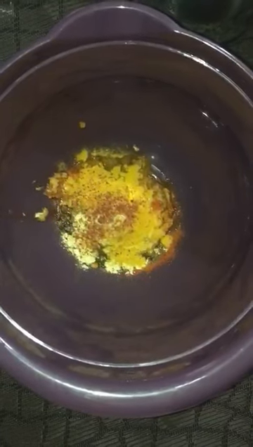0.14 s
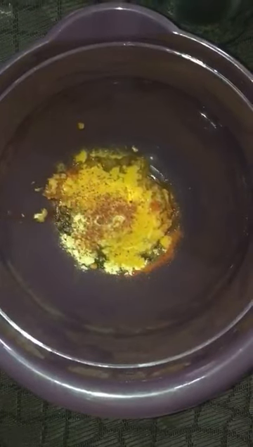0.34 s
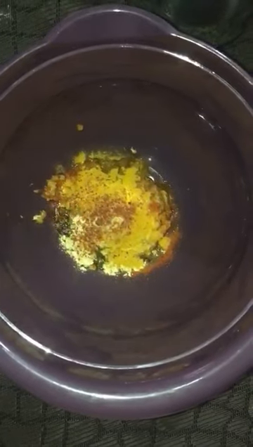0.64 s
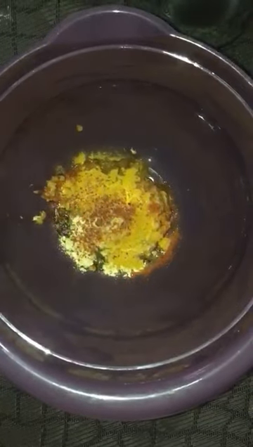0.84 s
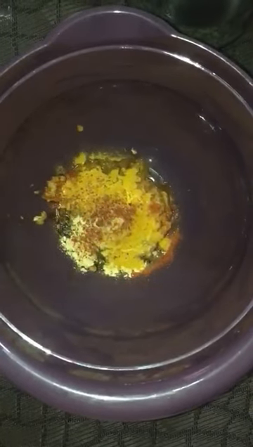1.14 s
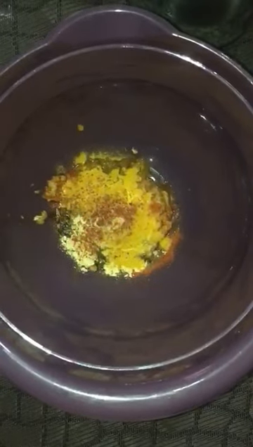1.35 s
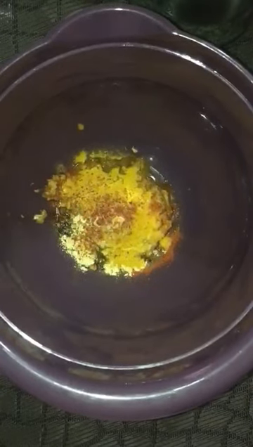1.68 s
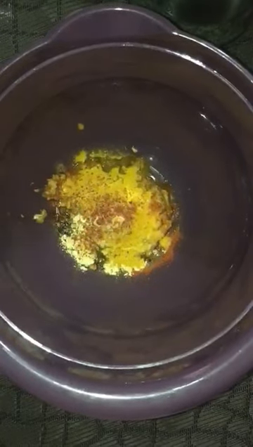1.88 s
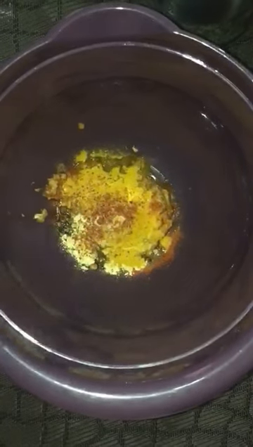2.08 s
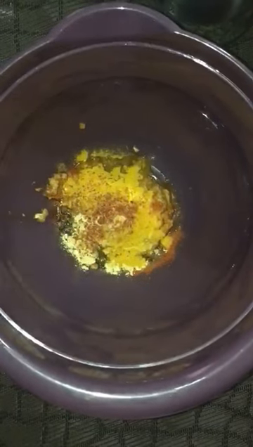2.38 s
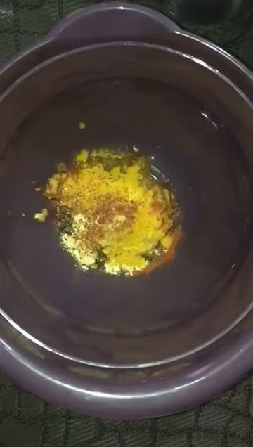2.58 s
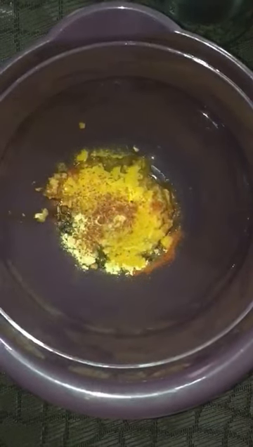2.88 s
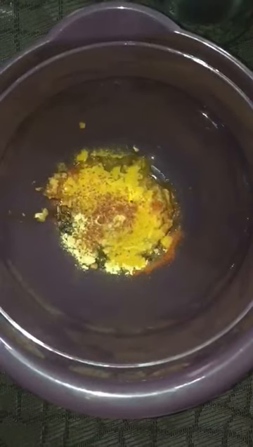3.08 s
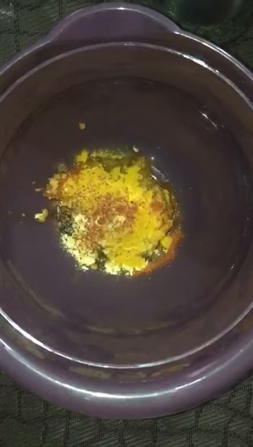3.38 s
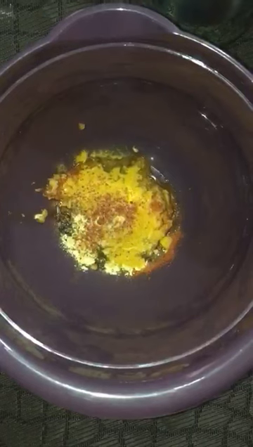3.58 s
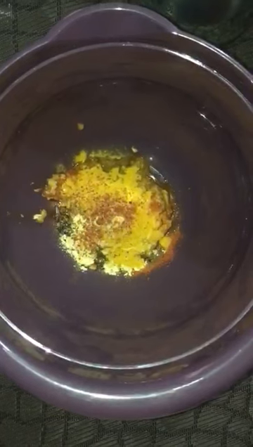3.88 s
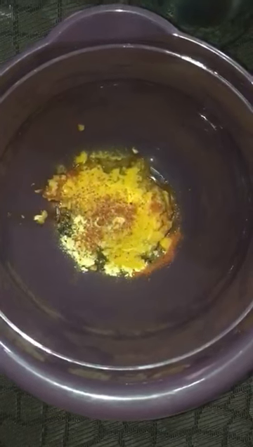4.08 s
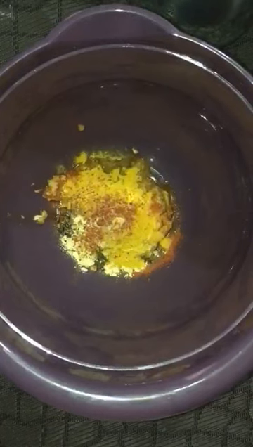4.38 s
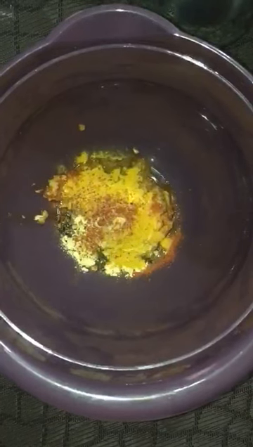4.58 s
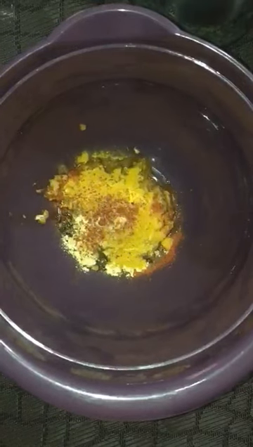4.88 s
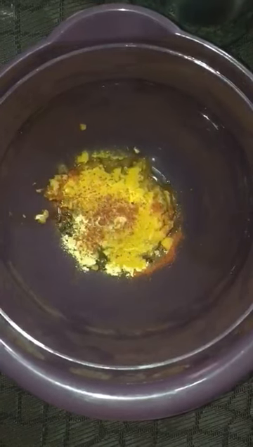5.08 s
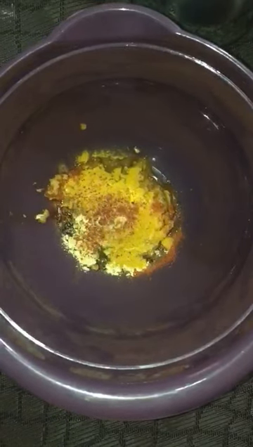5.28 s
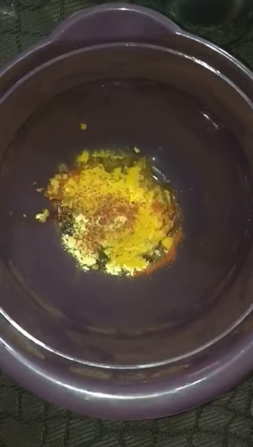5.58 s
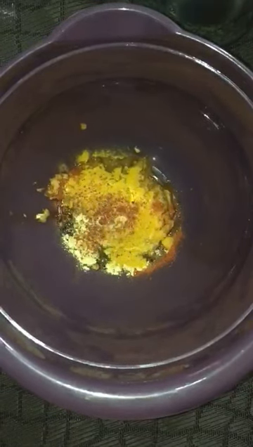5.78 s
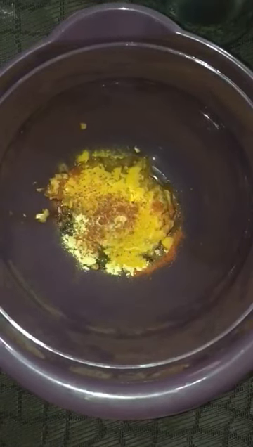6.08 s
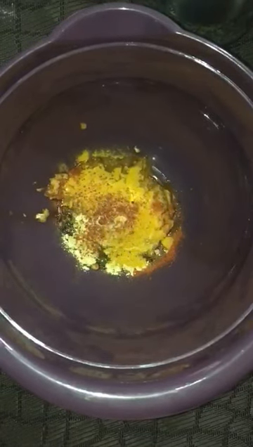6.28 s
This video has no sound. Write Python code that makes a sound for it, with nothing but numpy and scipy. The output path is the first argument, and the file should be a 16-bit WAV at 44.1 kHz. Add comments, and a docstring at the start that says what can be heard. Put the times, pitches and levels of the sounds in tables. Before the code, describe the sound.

Kitchen clatter: tin scrape and jar thump, hard knocks, a dropped lid, one loud pot clack, then fading dish wobble and small late clinks.

```python
"""Kitchen table: spices are spooned out, a steel tin scrapes, jars and lids are knocked and set down.
Blows are filtered noise plus decaying modes; steel cutlery clinks in short, dull modes; scrapes are
swells of noise. A dish rocks in paired taps, ever faster and weaker. A bird calls outside in gliding,
roughened sines, over still air, a faint two-tone hum and distant traffic with one vehicle passing."""
import sys
import numpy as np
from scipy import signal
from scipy.fft import rfft, irfft, next_fast_len
from scipy.io import wavfile
from scipy.ndimage import map_coordinates

SR = 44100
rng = np.random.default_rng(int(sys.argv[2]) if len(sys.argv) > 2 else 0)


def master(y):
    """Save y as 16-bit WAV."""
    cut = np.clip(np.atleast_2d(y).T, -1, 1)
    pcm = np.round(cut * 32767)  # scale
    wavfile.write(sys.argv[1], SR, pcm.astype(np.int16))


N = 284445
CLOCK_S = np.arange(N) / SR
T = np.arange(SR * 3 // 4) / SR  # time axis of one event, s
TOP_HZ = 11950  # band limit of the recorder


def amp(db):
    """Decibels to gain."""
    return 10 ** (np.asarray(db) / 20)


def unit(x):
    """Scale to rms 1."""
    return x / np.sqrt(np.mean(x ** 2) + 1e-20)


def blow(x):
    """Scale to the energy of 10 ms at rms 1."""
    return x * np.sqrt(SR / 100 / (np.sum(x ** 2) + 1e-20))


def fade(t60_s):
    """Exponential decay, 60 dB in t60_s."""
    return amp(-60 * T / t60_s)


def along(points, hz):
    """Read (Hz, value) points on a log frequency axis."""
    f, v = np.transpose(points)
    return np.interp(np.log(hz + 1), np.log(f), v)


def add(track, start_s, x):
    """Mix x into the track from start_s on."""
    i = round(start_s * SR)
    x = x[max(-i, 0):max(N - i, 0)]
    track[max(i, 0):][:len(x)] += x


def colour(x, spectrum):
    """Causal minimum-phase filter with the given spectrum, by folding its cepstrum."""
    m = 2 * next_fast_len(len(x) // 2 + 2048)
    gain = amp(along(spectrum, np.fft.rfftfreq(m, 1 / SR)))
    cepstrum = irfft(np.log(gain + 1e-6))
    cepstrum[1:m // 2] *= 2
    cepstrum[m // 2 + 1:] = 0
    response = np.exp(rfft(cepstrum))
    return irfft(rfft(x, m) * response, m)[:len(x)]


def wobble(knots_per_s, size):
    """Smooth random curve through normal knots."""
    knots = rng.standard_normal(int(size * knots_per_s / SR) + 4)
    return map_coordinates(knots, [np.arange(size) * knots_per_s / SR])


def contact(t60_s):
    """Contact force: a decaying burst of chatter."""
    return rng.standard_normal(len(T)) * fade(t60_s)


def decaying(resonances, sustain, damping=0):
    """Resonances as modes (Hz, dB, t60 s): narrow ones ring longest, damping shortens the high ones."""
    modes = []
    for hz, width_hz, level_db in resonances:
        t60_s = sustain * np.log(1000) / np.pi / width_hz * (1000 / hz) ** damping
        modes.append((hz, level_db, t60_s))
    return modes


def ring(modes, scatter_db=2.5):
    """Sum of decaying sines, with new strengths and signs for each blow."""
    out = np.zeros(len(T))
    for hz, level_db, t60_s in modes:
        strength = rng.choice([-1, 1]) * amp(level_db + scatter_db * rng.normal())
        out += strength * fade(t60_s) * np.sin(2 * np.pi * hz * T)
    return blow(out)


# reverberation of the kitchen: (frequency [Hz], t60 [s])
KITCHEN_T60 = [(150, 0.6), (600, 0.44), (2000, 0.38), (5000, 0.37), (11000, 0.19)]


def in_room(x, wet_db, near_db=-7, near_t60_s=0.099):
    """Add quick echoes from the table and walls, and the kitchen's frequency-dependent tail."""
    hz, t, z = signal.stft(rng.standard_normal(len(T)), SR, nperseg=256)
    decay = amp(-60 * t / along(KITCHEN_T60, hz)[:, None])
    tail = signal.istft(z * decay, SR, nperseg=256)[1][:len(T)]
    tail *= 1 - np.exp(-T / 0.0027)
    near = contact(near_t60_s) * (T > .003)
    echo = amp(wet_db) * tail / np.linalg.norm(tail)
    echo += amp(near_db) * near / np.linalg.norm(near)
    return x + signal.fftconvolve(x, echo)[:len(x)]


# thud in the table: (frequency [Hz], density [dB per Hz])
THUD_SPECTRUM = [(40, -46.5), (100, -13), (170, -4.5), (300, 0), (700, -33.5), (2000, -93)]
# crack at the contact: (frequency [Hz], density [dB per Hz])
CRACK_SPECTRUM = [(500, -42), (2500, -0.5), (5000, 2.5), (8000, -4.5), (12000, -15)]
HARD_HZ, SOFT_OCTAVES = 9400, 3  # cut-off of the hardest contact; drop at softness 1
SOFT_CRACK_DB, SOFT_THUD_DB = -24.5, 11.5  # gain changes at softness 1


def knocks(hits, spectrum, resonances, contact_t60_s, sustain, ring_db, thud_db, crack_db, wet_db):
    """Each blow is a clack, the thing's ring, a thud in the table and a crack at the contact."""
    out = np.zeros(N)
    modes = decaying(resonances, sustain)
    for start_s, level_db, softness in hits:
        clack = blow(colour(contact(contact_t60_s), spectrum))
        body = clack + amp(ring_db) * ring(modes)
        # a soft contact drives the high modes less
        cutoff_hz = HARD_HZ * 2 ** (-SOFT_OCTAVES * softness)
        body = blow(signal.lfilter(*signal.butter(1, cutoff_hz, fs=SR), body))
        thud = blow(colour(contact(0.0016), THUD_SPECTRUM))
        thud *= amp(thud_db + SOFT_THUD_DB * softness)
        crack = blow(colour(contact(0.013), CRACK_SPECTRUM))
        crack *= amp(crack_db + SOFT_CRACK_DB * softness)
        add(out, start_s, amp(level_db) * in_room(body + thud + crack, wet_db))
    return out


def steel(hits, modes, focus_db, tick_db, wet_db):
    """Struck steel: the point of contact favours modes around one height; focus_db per octave squared."""
    out = np.zeros(N)
    for start_s, level_db, centre_hz in hits:
        favoured = []
        for hz, mode_db, t60_s in modes:
            favoured.append((hz, mode_db - focus_db * np.log2(hz / centre_hz) ** 2, t60_s))
        # while the surfaces touch, they chatter and damp the modes
        pressed = ring([(hz, mode_db, .008) for hz, mode_db, _ in favoured])
        tick = blow(signal.fftconvolve(contact(0.016), pressed)[:len(T)])
        clink = ring(favoured) + amp(tick_db) * tick
        add(out, start_s, amp(level_db) * in_room(clink, wet_db))
    return out


# still air: (frequency [Hz], density [dB per Hz])
AIR_SPECTRUM = [(12, -46.5), (20, -3.5), (111, -9.5), (195, -1), (222, -6), (291, -17), (446, -26.5),
                (553, -16.5), (783, -28), (1050, -24), (1530, -26.5), (4960, -32), (8940, -34),
                (11100, -36.5), (12000, -48.5), (15600, -80.5), (22000, -120)]


def still_air(level_db=-63):
    """Steady broadband noise of the room's air."""
    return amp(level_db) * unit(colour(rng.standard_normal(N), AIR_SPECTRUM))


# hum tones: (frequency [Hz], level [dB])
HUM_TONES = [(59, -72), (101, -71)]


def electric_hum():
    """Low sines that waver slightly in level and phase."""
    out = np.zeros(N)
    for hz, level_db in HUM_TONES:
        gain = amp(level_db + 2.0 * wobble(9.9, N)) * np.sqrt(2)
        out += gain * np.sin(2 * np.pi * hz * CLOCK_S + .6 * wobble(12, N))
    return out


# traffic: (frequency [Hz], density [dB per Hz])
ROAD_SPECTRUM = [(24, -43.5), (40, -9), (106, -1.5), (146, -17), (192, -4.5), (237, -27), (351, 1.5),
                 (557, -24), (640, -9), (686, -22), (825, -9.5), (1040, -16), (2130, -16.5), (2940, -27.5),
                 (10000, -47), (13000, -65.5), (22000, -120)]
TRAFFIC_DB, PASS_DB = -75.5, -59  # distant road; one vehicle at its nearest
PASS_START_S, PASS_RISE_S, PASS_HOLD_S, PASS_FALL_S = 4.65, 0.38, 1.02, 0.77


def traffic():
    """Distant road noise; one vehicle approaches, stays near and recedes."""
    passing_s = np.cumsum([PASS_START_S, PASS_RISE_S, PASS_HOLD_S, PASS_FALL_S])
    road_db = np.interp(CLOCK_S, passing_s, [TRAFFIC_DB, PASS_DB, PASS_DB, TRAFFIC_DB])
    road = unit(colour(rng.standard_normal(N), ROAD_SPECTRUM))
    return amp(road_db + 0.45 * wobble(20.0, N)) * road


PITCH_SHAKE = .08  # scale of the pitch shake at roughness 1, as a share of pitch


def note(length_s, hz, octaves, rough, smooth_attack_s=0.0017, wet_db=-3):
    """One gliding, echoing whistle; roughness 0-1 shakes pitch and strength and slows the attack."""
    u = np.minimum(T / length_s, 1)
    pitch_hz = hz * 2 ** (octaves * (u - .5)) * (1 + PITCH_SHAKE * rough * wobble(1108, len(T)))
    attack = 1 - np.exp(-T / (smooth_attack_s * (1 + 3 * rough)))
    effort = attack * np.sqrt(1 - u) * amp(5.8 * rough * wobble(319, len(T)))
    tone = np.sin(2 * np.pi * np.cumsum(pitch_hz) / SR)
    return in_room(2 * effort * tone, wet_db, near_db=-8)


# whistles of level pitch, each led in by a short rasp: (time [s], length [s], level [dB])
BIRD_WHISTLES = [(0.482, 0.052, -51.5), (0.75, 0.048, -48.5), (4.183, .022, -49)]
WHISTLE_HZ, WHISTLE_ROUGH = 3354, .13
LEAD_HZ, LEAD_S, LEAD_DB = 2660, 0.0059, -7.5  # lead-in: mid pitch, head start, level re whistle
# rising slurs: (time [s], level [dB])
BIRD_SLURS = [(.882, -54), (4.067, -55)]
SLUR_HZ, SLUR_S, SLUR_OCTAVES, SLUR_ROUGH = 2575, 0.05, 0.16, .33  # mid pitch, length, rise
# falling rasps: (time [s], length [s], mid pitch [Hz], level [dB])
BIRD_RASPS = [(.98, 0.14, 3022, -58), (4.222, 0.054, 2837, -54.5)]
RASP_OCTAVES, RASP_ROUGH = -0.237, .95
# sagging pips: (time [s], length [s], mid pitch [Hz], level [dB])
BIRD_PIPS = [(0.898, 0.031, 1430, -50.5), (3.333, 0.046, 3850, -58), (3.543, 0.0133, 2190, -59),
             (3.918, 0.018, 4240, -60)]
PIP_OCTAVES, PIP_ROUGH = -0.12, .35


def bird():
    """A bird outside sings four kinds of note: whistle, slur, rasp and pip."""
    out = np.zeros(N)
    for start_s, length_s, level_db in BIRD_WHISTLES:
        lead = note(0.0254, LEAD_HZ, RASP_OCTAVES, RASP_ROUGH)
        add(out, start_s - LEAD_S, amp(level_db + LEAD_DB) * lead)
        add(out, start_s, amp(level_db) * note(length_s, WHISTLE_HZ, 0, WHISTLE_ROUGH))
    for start_s, level_db in BIRD_SLURS:
        add(out, start_s, amp(level_db) * note(SLUR_S, SLUR_HZ, SLUR_OCTAVES, SLUR_ROUGH))
    for start_s, length_s, hz, level_db in BIRD_RASPS:
        add(out, start_s, amp(level_db) * note(length_s, hz, RASP_OCTAVES, RASP_ROUGH))
    for start_s, length_s, hz, level_db in BIRD_PIPS:
        add(out, start_s, amp(level_db) * note(length_s, hz, PIP_OCTAVES, PIP_ROUGH))
    return out


# dish modes: (frequency [Hz], level [dB], t60 [s])
DISH_MODES = [(191, 10, 0.23), (211, -2, 0.17), (544.8, -9.5, 0.2), (634, -16, 0.12), (945, -16.5, 0.072)]
ROCK_START_S, SWING_S, SWING_SHRINK_S, SWINGS = 1.323, .14742, .00096, 29  # shrink is per swing
RETURN_S, RETURN_LAG_S = .068, .0005  # delay of a swing's second tap; its growth per swing
ROCK_DB, ROCK_FALL_DB, ROCK_HOLD = -47.5, 10, 3  # first tap, loss by the last, power of time


def rocking_dish(tap_db=-16, wet_db=-13):
    """Two taps per swing: swings shorten, the second tap lags more, the strength holds, then falls."""
    out = np.zeros(N)
    swing = np.arange(SWINGS)
    forth_s = ROCK_START_S + SWING_S * swing - SWING_SHRINK_S * swing * (swing - 1) / 2
    back_s = forth_s + RETURN_S + RETURN_LAG_S * swing
    tap_spectrum = [(100, -16), (500, 5.5), (1100, 0), (2500, -24.0), (9000, -33.5)]  # Hz, dB per Hz
    for start_s in np.concatenate([forth_s, back_s]):
        spent = (start_s - ROCK_START_S) / (back_s[-1] - ROCK_START_S)
        tap = blow(colour(contact(0.037), tap_spectrum))
        knock = in_room(ring(DISH_MODES) + amp(tap_db) * tap, wet_db, near_db=-18.5)
        add(out, start_s, amp(ROCK_DB - ROCK_FALL_DB * spent ** ROCK_HOLD) * knock)
    return out


# blows: (time [s], level [dB], softness [0-1])
TABLE_BLOWS = [(.444, -47.5, 1), (1.2035, -21, 0.048), (1.31, -40.5, 0.36), (5.133, -55.5, 0.85),
               (5.34, -48.5, .2), (5.371, -46, 1)]
# clack: (frequency [Hz], density [dB per Hz])
TABLE_SPECTRUM = [(47, -42), (80, -28), (156, 4.5), (456, -11.5), (611, 8), (679, -2), (1050, -1.5),
                  (1540, -22.5), (2150, -3.5), (2650, -14), (3480, -15), (4870, -26), (9530, -91),
                  (12000, -68.5), (15600, -86), (22000, -120)]
# resonances: (frequency [Hz], width [Hz], level [dB])
TABLE_RESONANCES = [(159, 25, -4), (617, 60, 3), (1145, 190, 11), (1960, 91, -8), (3050, 110, -30),
                    (3670, 34, -22), (5660, 63, -48), (5760, 23, -30), (8650, 130, -31)]


def table():
    """Knocks on the table top: short contact, strong thud."""
    return knocks(TABLE_BLOWS, TABLE_SPECTRUM, TABLE_RESONANCES, contact_t60_s=0.008, sustain=1.2,
                  ring_db=-3.5, thud_db=-9, crack_db=-11.5, wet_db=-10.0)


# blows: (time [s], level [dB], softness [0-1])
BOWL_BLOWS = [(.5895, -34.5, .05), (.757, -53, 0.5)]
# clack: (frequency [Hz], density [dB per Hz])
BOWL_SPECTRUM = [(120, -50), (200, -58), (589, 3.5), (903, -20), (1070, -15), (1460, -28), (2020, -14),
                 (2480, -20), (3150, -18), (4370, -33), (6260, -26.5), (6940, -36), (12000, -35),
                 (15600, -83), (22000, -120)]
# resonances: (frequency [Hz], width [Hz], level [dB])
BOWL_RESONANCES = [(614, 29, 0), (1020, 27, -10), (1980, 18, -11), (2690, 28, -19), (3490, 34, -19),
                   (6180, 41, -23)]


def bowl():
    """Knocked bowl: a few narrow modes, little thud."""
    return knocks(BOWL_BLOWS, BOWL_SPECTRUM, BOWL_RESONANCES, contact_t60_s=0.012, sustain=0.97,
                  ring_db=-1.5, thud_db=-44, crack_db=-20, wet_db=-12)


# blows: (time [s], level [dB], softness [0-1])
CAP_BLOWS = [(5.8338, -29.5, 0.041), (5.845, -36.5, 0.93)]
# clack: (frequency [Hz], density [dB per Hz])
CAP_SPECTRUM = [(88, -58), (150, -35), (225, -6), (296, -29), (404, -2), (532, -36), (615, -4), (753, -19),
                (991, -32), (1070, -8.5), (1750, 4.5), (3030, -7), (3990, -13.5), (7730, -23.5),
                (12000, -29), (15600, -90), (22000, -120)]
# resonances, shared with the ticks: (frequency [Hz], width [Hz], level [dB])
CAP_RESONANCES = [(404, 27, -6), (614, 28, -4), (1370, 160, -4), (1780, 37, 0), (2940, 22, -8),
                  (3100, 17, -10), (4450, 54, -19), (5790, 39, -19)]


def cap():
    """Knocked cap: mostly clack, with a short weak ring."""
    return knocks(CAP_BLOWS, CAP_SPECTRUM, CAP_RESONANCES, contact_t60_s=0.017, sustain=0.65,
                  ring_db=-10.5, thud_db=-35.0, crack_db=-10.5, wet_db=-12)


# blows: (time [s], level [dB], softness [0-1])
TICK_BLOWS = [(3.548, -63.5, 0.33), (4.783, -62.5, 0.03), (5.118, -46.5, 0.45), (5.13, -41.5, 0.79),
              (6.194, -52.5, 0.55), (6.206, -57, 0.34), (6.263, -62, 0.056), (6.369, -55, 1),
              (6.39, -60, 0.29), (6.416, -55.5, 0.045)]
# clack: (frequency [Hz], density [dB per Hz])
TICK_SPECTRUM = [(120, -14), (200, -33.5), (735, -5), (1360, -4.5), (2160, 1.5), (3620, -8), (3940, -38),
                 (10300, -15), (11200, -12), (12000, -22), (15600, -81), (22000, -120)]


def ticks():
    """Small ticks: clack and contact crack, almost no ring."""
    return knocks(TICK_BLOWS, TICK_SPECTRUM, CAP_RESONANCES, contact_t60_s=0.016, sustain=.8,
                  ring_db=-58, thud_db=-17, crack_db=5, wet_db=-10.5)


# blows: (time [s], level [dB], softness [0-1])
LID_BLOWS = [(1.564, -39, .75), (1.657, -44, .75), (1.7095, -19.5, .05), (1.744, -24, .55),
             (1.7855, -31.5, .6)]
# clack: (frequency [Hz], density [dB per Hz])
LID_SPECTRUM = [(59, -56), (100, -33), (227, -9), (684, -13.5), (870, 4.5), (981, -18), (1300, -13.5),
                (1460, -9), (2840, -29.5), (3140, -20.5), (4230, -41.5), (5170, -33), (8370, -49.5),
                (12000, -63), (15600, -94), (22000, -120)]
# resonances: (frequency [Hz], width [Hz], level [dB])
LID_RESONANCES = [(217.2, 110, -11.5), (890, 38, 9.5), (1097, 9.8, -8), (1270, 38, -4.5), (1620, 33, -22.5),
                  (2590, 36, -26), (3100, 95, -25.5), (5135, 30, -28.5), (5500, 65, -26), (6106, 49, -34),
                  (8324, 140, -34)]
# touches of the steel edge: (time [s], level [dB], height of the struck modes [Hz])
EDGE_TOUCHES = [(1.7095, -38.5, 5333), (1.744, -46.5, 4986)]
# edge modes: (frequency [Hz], level [dB], t60 [s])
EDGE_MODES = [(2900, -9.5, .14), (3083, -1, .31), (5055, -1.5, 0.1), (5283, 0.5, 0.12), (6090, -8, .15),
              (8700, -11, .12)]


def falling_lid():
    """The lid is nudged, drops and bounces: short clacks, with a thin ring from its steel edge."""
    clacks = knocks(LID_BLOWS, LID_SPECTRUM, LID_RESONANCES, contact_t60_s=.014, sustain=.6,
                    ring_db=-3, thud_db=-27.5, crack_db=-17, wet_db=-12)
    return clacks + steel(EDGE_TOUCHES, EDGE_MODES, focus_db=3.5, tick_db=4, wet_db=-14)


# blows: (time [s], level [dB], softness [0-1])
JAR_BLOWS = [(.1, -16, 0.51), (.111, -32, 0.03), (.311, -42, 0.36)]
# clack: (frequency [Hz], density [dB per Hz])
JAR_SPECTRUM = [(59, -52), (100, -11.5), (375, -5), (644, 7), (836, -33), (1410, -30.5), (1900, 9),
                (2140, -15), (3260, -18.5), (3540, -4), (4500, -16.5), (4780, -16.5), (11100, -39),
                (12000, -40.5), (15600, -77), (22000, -120)]
# resonances: (frequency [Hz], width [Hz], level [dB])
JAR_RESONANCES = [(374.7, 28, -5.5), (1236, 26, -23.5), (1817, 57, 4), (2606, 41, -6.5), (3125, 18, -7),
                  (4150, 44, -15), (4310, 32, -10), (4500, 35, -24), (5095, 43, -17.5), (6160, 60, -7),
                  (6070, 49, -24), (7000, 40, -26), (8120, 31, -24.5)]


def jar():
    """Knocked jar: clack and modes with a bright contact crack."""
    return knocks(JAR_BLOWS, JAR_SPECTRUM, JAR_RESONANCES, contact_t60_s=0.022, sustain=.6,
                  ring_db=-4, thud_db=-17, crack_db=0, wet_db=-12.0)


# blows: (time [s], level [dB], softness [0-1])
POT_BLOWS = [(1.8877, -11.5, 0.21), (1.8985, -10, 0.061), (1.919, -23, .7), (1.93, -21, 0.36)]
# clack: (frequency [Hz], density [dB per Hz])
POT_SPECTRUM = [(47, -63), (80, -45), (214, -3.5), (465, -6.5), (624, -7.5), (754, -8), (820, -4),
                (1330, -4), (1440, -11.5), (1640, -1), (3870, -20.5), (4570, -22.5), (4970, -20),
                (10400, -38.5), (12000, -55), (15600, -80), (22000, -120)]
# resonances: (frequency [Hz], width [Hz], level [dB])
POT_RESONANCES = [(251.3, 150, -12.5), (636.2, 59, 1.5), (841, 40, 3.5), (1350, 40, -4), (1680, 71, -5.5),
                  (1915, 88, -8), (2187, 25, -12.5), (2554, 62, -13), (2853, 57, -15.5)]


def pot():
    """Knocked pot: the loudest blows, a long clack over broad modes."""
    return knocks(POT_BLOWS, POT_SPECTRUM, POT_RESONANCES, contact_t60_s=.035, sustain=1.15,
                  ring_db=-4.5, thud_db=-19.5, crack_db=-14.5, wet_db=-12)


# touches: (time [s], level [dB], height of the struck modes [Hz])
TIN_CLINKS = [(.009, -31, 3070), (.017, -28, 6030), (.064, -34.5, 2700), (2.613, -57.5, 710)]
# resonances: (frequency [Hz], width [Hz], level [dB])
TIN_RESONANCES = [(1200, 30, -1), (1390, 25, -6), (2230, 32, -13), (2640, 80, 0), (4060, 76, -4),
                  (5090, 38, -6), (5830, 49, -5), (6230, 27, -6), (6590, 40, -5), (6880, 60, -12),
                  (7180, 29, -16), (8130, 31, -17), (8590, 71, -18), (9090, 68, -11), (9610, 95, -16),
                  (10000, 30, -17), (10800, 29, -20), (11400, 32, -13)]


def tin(drag_db=-31, drag_t60_s=0.32, release_s=0.082):
    """The tin is touched and dragged; friction keeps its modes singing until it lets go."""
    modes = decaying(TIN_RESONANCES, sustain=2.8, damping=0.45)
    out = steel(TIN_CLINKS, modes, focus_db=6.5, tick_db=1, wet_db=-1.5)
    friction = contact(drag_t60_s) * (T < release_s)
    singing = unit(signal.fftconvolve(friction, ring(modes))[:len(T)])
    singing *= np.sqrt(release_s / T[-1])
    add(out, .006, amp(drag_db) * in_room(singing, wet_db=-10))
    return out


# strokes: (time [s], length [s], level [dB], grit [dB re level])
SCRAPE_STROKES = [(-.01, 0.038, -39, -2.5), (0.025, 0.073, -48, 9), (0.304, .16, -49.5, -5),
                  (1.52, 0.025, -53, -14), (2.263, 0.065, -64.5, -2), (3.315, 0.046, -61, -18),
                  (3.719, 0.086, -45, -7.5), (3.807, 0.11, -63.5, -4.5), (5.126, 0.0215, -45, -4.5),
                  (5.175, 0.24, -54.5, -8), (6.132, 0.067, -66.5, 2), (6.253, 0.038, -67.5, 8.5),
                  (6.343, 0.047, -60.5, 2)]
# hollow part: (frequency [Hz], density [dB per Hz])
HOLLOW_SPECTRUM = [(59, -33), (100, 1), (349, -7), (637, 4.5), (829, -9.5), (1080, -7), (1260, -10),
                   (1770, -3.5), (2060, -1.5), (2520, -12.5), (3220, -5), (4000, -25), (5200, -50.5),
                   (8800, -120)]
# gritty part: (frequency [Hz], density [dB per Hz])
GRIT_SPECTRUM = [(1470, -27), (2500, -8), (2690, -7), (3450, -19), (3960, -6.5), (4630, -10.5),
                 (6430, -10.5), (7680, -14.5), (9350, -14.5), (11800, -20), (12000, -24), (15600, -63.5),
                 (22000, -120)]
PRESS_DB = 6.5  # pressure gain from start to end of a stroke


def scraping(clump_db=3.5, rub_db=3.0, wet_db=-7):
    """Tiny slips swell under growing, uneven pressure: hollow in the vessel, gritty at the edge."""
    out = np.zeros(N)
    for start_s, length_s, level_db, grit_db in SCRAPE_STROKES:
        u = np.minimum(T / length_s, 1)
        pressure = amp(PRESS_DB * u + rub_db * wobble(60, len(T)))
        swell = np.sqrt(np.abs(np.sin(np.pi * u))) * pressure
        slips = swell * unit(rng.standard_normal(len(T)) * amp(clump_db * wobble(500, len(T))))
        hollow = unit(colour(slips, HOLLOW_SPECTRUM))
        grit = unit(colour(slips, GRIT_SPECTRUM))
        stroke = (hollow + amp(grit_db) * grit) * np.sqrt(length_s / T[-1])
        add(out, start_s, amp(level_db) * in_room(stroke, wet_db))
    return out


# clinks of each piece of cutlery: (time [s], level [dB], height of the struck modes [Hz])
FIRST_SPOON_CLINKS = [(1.272, -40, 5430)]
SMALL_SPOON_CLINKS = [(3.7155, -50.5, 5000), (3.718, -46.5, 7900), (3.775, -53.5, 7000), (3.806, -49, 9500)]
THIRD_SPOON_CLINKS = [(5.369, -46.5, 4370), (5.372, -46.5, 9400), (6.112, -66, 2500)]
# resonances of each piece: (frequency [Hz], width before widening [Hz], level [dB])
FIRST_SPOON_RESONANCES = [(3220, 88, 0), (3670, 27, -7), (3840, 30, -11), (6110, 20, -3), (6330, 34, -1),
                          (8420, 30, -9), (9150, 25, -12), (9960, 27, -10), (10600, 44, -13),
                          (11500, 130, -21)]
SMALL_SPOON_RESONANCES = [(3080, 33, 0), (4800, 110, -3), (5470, 24, -4), (6190, 110, -13), (7430, 23, -15),
                          (8260, 48, -1), (8520, 53, -1), (9990, 59, -16), (11400, 26, -14)]
THIRD_SPOON_RESONANCES = [(2160, 43, -8), (3070, 82, 0), (4640, 38, -13), (5830, 40, -12), (6150, 110, -6),
                          (8350, 34, -23), (10100, 58, -12), (11400, 29, -21)]


def cutlery(extra_width_hz=28):
    """Clinks of three steel pieces; every resonance is widened, so the clinks are short and dull."""
    out = np.zeros(N)
    pieces = [(FIRST_SPOON_CLINKS, FIRST_SPOON_RESONANCES),
              (SMALL_SPOON_CLINKS, SMALL_SPOON_RESONANCES),
              (THIRD_SPOON_CLINKS, THIRD_SPOON_RESONANCES)]
    for hits, resonances in pieces:
        widened = [(hz, width_hz + extra_width_hz, level_db) for hz, width_hz, level_db in resonances]
        modes = decaying(widened, sustain=2.2, damping=0.43)
        out += steel(hits, modes, focus_db=3.5, tick_db=5.5, wet_db=-15)
    return out


def scene():
    """Sum of all sources, one channel."""
    background = still_air() + electric_hum() + traffic()
    dishes = rocking_dish() + table() + bowl() + cap() + ticks() + falling_lid() + jar() + pot()
    spooning = tin() + scraping() + cutlery()
    return (background + bird() + dishes + spooning)[None]


def record(dry):
    """The recorder thins deep bass and cuts steeply above its band limit; the hardest peaks are rounded off."""
    thin = signal.sosfilt(signal.butter(2, 45, "high", fs=SR, output="sos"), dry)
    rounded = thin / (1 + np.abs(thin / .88) ** 6) ** (1 / 6)
    m = next_fast_len(N + SR // 2)
    hz = np.fft.rfftfreq(m, 1 / SR)
    band_gain = 1 / np.sqrt(1 + (hz / TOP_HZ) ** 120)
    return irfft(rfft(rounded, m) * band_gain, m)[..., :N]


dry = scene()
out = record(dry)
master(out)
```